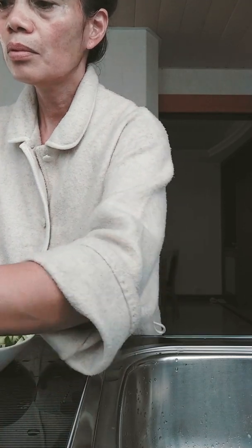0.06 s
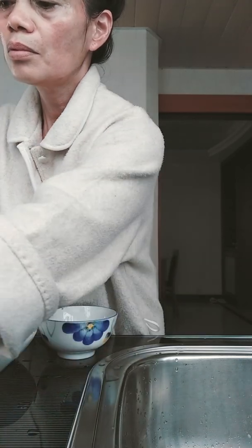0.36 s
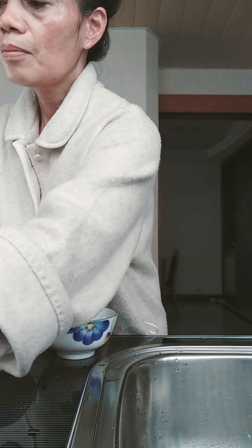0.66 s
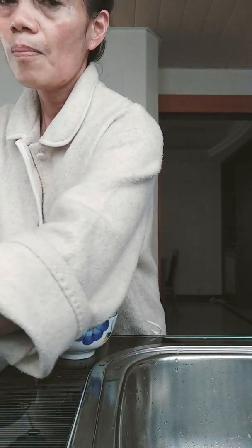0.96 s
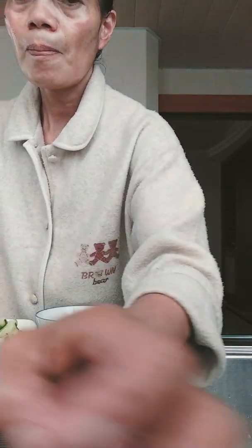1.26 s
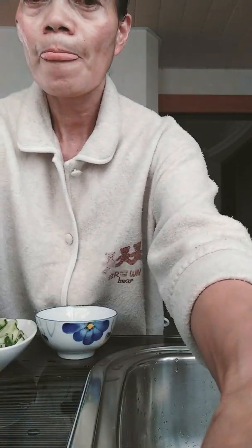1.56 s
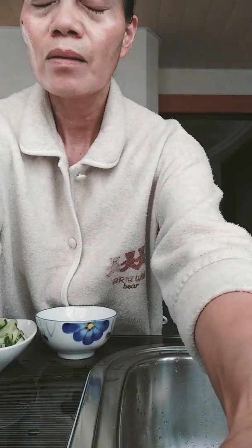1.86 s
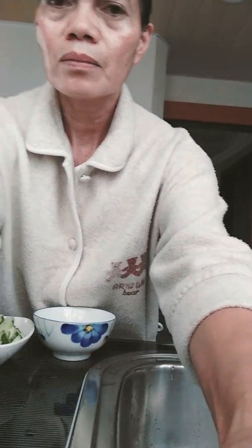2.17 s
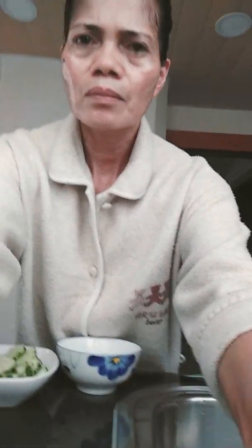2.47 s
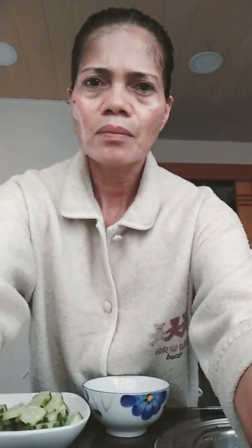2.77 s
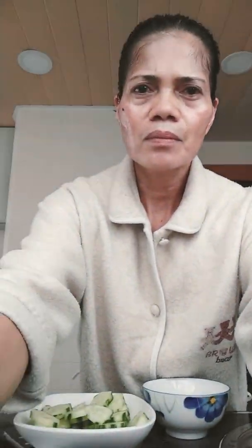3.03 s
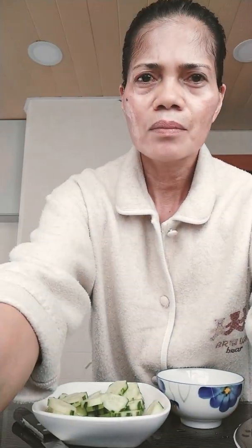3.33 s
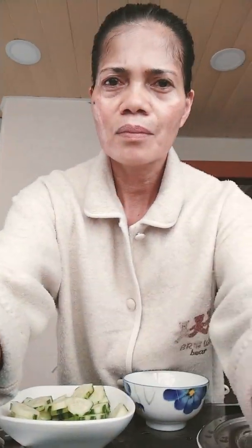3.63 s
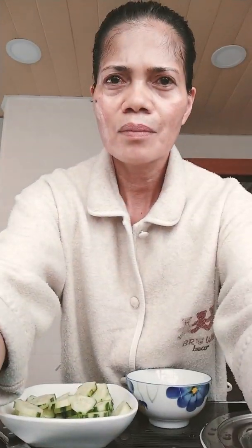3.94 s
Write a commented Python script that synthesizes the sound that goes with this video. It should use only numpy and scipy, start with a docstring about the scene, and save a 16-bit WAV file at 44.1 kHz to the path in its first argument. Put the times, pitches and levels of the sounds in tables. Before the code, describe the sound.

A ceramic bowl knocks and clinks on a kitchen counter from the start, with the loudest hollow clacks around 0.7 to 1.1 seconds and a short room echo. It then rocks ever faster, fading to rest by 1.7 seconds. Tiny ticks follow as a phone is handled, with close finger taps and soft thumps near 2.4, 2.6 and 3.7 seconds. A faint hum lies underneath; everything leans left.

```python
"""Hollow knocks and clacks: a hard dish is shifted on a kitchen counter, knocked down again, and rocks
ever faster until it rests. Each knock rings the dish and the counter, and the room answers.
Then, right at the microphones, a hand picks up the phone: finger taps, soft thumps and tiny ticks
on its case. A quiet room hum lies under it all; the stereo picture leans to the left."""
import sys
import numpy as np
from scipy import signal
from scipy.fft import rfft, irfft
from scipy.io import wavfile

SR = 44100
rng = np.random.default_rng(int(sys.argv[2]) if len(sys.argv) > 2 else 0)


def store_pcm(level_fs):
    """Save levels as 16-bit WAV."""
    pcm = np.round(np.clip(level_fs, -1, 1) * 32767).astype(np.int16)
    wavfile.write(sys.argv[1], SR, np.atleast_2d(pcm).T)


N = 176400
TIME = np.arange(N) / SR
BODY_RISE_S = 0.001  # attack of dish and counter
EDGE_RIGHT_DB = -5.5  # the crockery's highs at the right microphone


def dish(clink_s=0.2565):
    """The shifted dish knocks on the counter, with one glassy clink of glaze on glaze."""
    # the dish meets the counter: start_s, ring_db, clack_db, edge_db
    knocks = [(0.001, -16, -19.5, -37.5), (0.029, -18.5, -30.5, -55.5), (0.06, -12, -14, -30),
              (0.111, -11, -16.5, -31), (0.153, -14.5, -28, -41.5), (0.258, -18, -17.5, -29),
              (0.277, -17, -37, -34.5), (0.2996, -14, -21, -41), (0.513, -26, -20, -43.5),
              (0.555, -31.5, -24, -51.5), (0.583, -30, -23.5, -48), (0.739, -9, -7, -25.5),
              (0.7855, -9, -3.5, -17.5), (0.798, -11.5, -28.5, -41), (0.9384, -7, -8, -26.5),
              (0.999, -15, -13, -25), (1.029, -14.5, -8, -29.5), (1.044, -8.5, -29, -28.5),
              (1.101, -14, -19, -33.5), (1.151, -14, -17, -38.5)]
    # colour of the clink: frequency_hz, gain_db
    clink_colour = [(2000, -11), (6900, 8), (7600, -17), (8800, 20.5), (9700, 17.5), (11000, -1)]
    # where the dish stands, as the right microphone hears it: time_s, gain_db
    dish_place = [(0.3, 1.5), (0.76, 3), (0.94, -1.5)]
    starts, ring_db, clack_db, edge_db = np.transpose(knocks)
    clink = contacts([clink_s], levels_db=[-3], fade_s=0.0043)
    clink = colour(clink, clink_colour) * sides(EDGE_RIGHT_DB)
    knocking = dish_ring(starts, ring_db) + blows(starts, ring_db, clack_db, edge_db)
    left, right = knocking + glaze(starts, edge_db) + clink
    return np.array([left, right * from_db(np.interp(TIME, *np.transpose(dish_place)))])


def rocking(rebound_s=0.0068, rebound_db=-4):
    """The dish settles from foot to foot, ever faster; each foot lands twice."""
    # a foot comes down: start_s, level_db
    rocks = [(1.166, -15.5), (1.223, -15), (1.273, -17), (1.325, -16), (1.375, -21.5), (1.410, -19.5),
             (1.448, -18.5), (1.486, -21), (1.516, -20.5), (1.535, -20.5), (1.552, -24), (1.585, -25.5),
             (1.612, -31.5), (1.639, -31.5)]
    starts, levels_db = np.transpose(rocks)
    landings = np.r_[starts, starts + rebound_s]
    landing_db = np.r_[levels_db, levels_db + rebound_db]
    ring = dish_ring(starts, levels_db)
    return ring + blows(landings, body_db=landing_db - 8, clack_db=landing_db - 7, edge_db=landing_db - 27)


def dish_ring(starts, levels_db, hollow_hz=820, hollow_db=1.5, swell_s=0.0037, scatter_db=2.5):
    """Every blow sounds a hollow note that swells and dies at once, and strikes each mode differently."""
    # modes of dish and counter: pitch_hz, level_db, t60_s
    modes = [(243.6, -18, 0.12), (370, -17.5, 0.13), (514.7, -12, 0.06), (606.8, -17.5, 0.21),
             (678.3, -13, 0.12), (939, -10.5, 0.1), (1164, -7, 0.049), (1395, -9, 0.03), (1630, -4, 0.019),
             (2296, -14.5, 0.021)]
    out, t = np.zeros((2, N)), TIME[:12000]
    hz, mode_db, t60 = np.transpose(modes)
    attack = 1 - np.exp(-t / BODY_RISE_S)
    ringing = np.sin(2 * np.pi * hz[:, None] * t) * from_db(-60 * t / t60[:, None]) * attack
    swell = t / swell_s * np.exp(1 - t / swell_s)
    for start_s, db in zip(starts, levels_db):
        strengths = from_db(mode_db + scatter_db * rng.standard_normal(len(hz)))
        strengths *= rng.choice([-1, 1], len(hz))
        note_hz = hollow_hz * (1 + 0.022 * rng.standard_normal())
        note = from_db(hollow_db) * swell * np.sin(2 * np.pi * note_hz * t)
        add(out, start_s, from_db(db) * (strengths @ ringing + note))
    return out * sides(right_db=-22)


def blows(starts, body_db, clack_db, edge_db, glance_s_per_db=0.02, right_lag_s=0.00016):
    """The dense body of the counter, the clack of the foot and its bright edge; glancing blows swell."""
    # colour of the counter's body: frequency_hz, gain_db
    body_colour = [(40, -34.5), (85, 12.5), (145, 22), (200, 13.5), (400, 30.5), (750, 32.5), (1170, 33),
                   (1700, 21.5), (3000, 4), (6000, -36)]
    # colour of the foot's clack: frequency_hz, gain_db
    clack_colour = [(500, 3.5), (1400, 31), (1900, 27), (2300, 32.5), (2950, 17.5), (3300, 21), (3650, 11),
                    (8000, -18)]
    # colour of the bright edge: frequency_hz, gain_db
    edge_colour = [(1500, -31), (4000, 25.5), (7200, 22.5), (8800, 30), (9900, 24.5), (11300, 10),
                   (14000, -3.5)]
    # the weaker the clack against the body, the more slowly the foot rolls on
    roll_s = np.maximum(glance_s_per_db * (body_db - clack_db), 0)
    body = contacts(starts, body_db, fade_s=0.008, rises_s=BODY_RISE_S + roll_s, alike=0.9)
    left, right = colour(body, body_colour)
    body = np.array([left, np.interp(TIME - right_lag_s, TIME, right)])
    clack = colour(contacts(starts, clack_db, fade_s=0.0062, rises_s=roll_s, alike=0.37), clack_colour)
    edge = colour(contacts(starts, edge_db, fade_s=0.018), edge_colour)
    return body * sides(right_db=-1) + clack * sides(right_db=-8) + edge * sides(EDGE_RIGHT_DB)


def glaze(starts, levels_db, t60_s=0.3):
    """The bright edge of each knock leaves thin, high tones ringing in the crockery."""
    # high modes of the crockery: pitch_hz, level_db
    modes = [(3320, -19.5), (5819, -22.5), (8540, -24), (10160, -23.5), (11040, -29), (12420, -22.5),
             (12980, -28)]
    out, t = np.zeros((2, N)), TIME[:SR // 2]
    hz, mode_db = np.transpose(modes)
    ringing = np.sin(2 * np.pi * hz[:, None] * t) * from_db(-60 * t / t60_s)
    for start_s, db in zip(starts, levels_db):
        strengths = from_db(db + mode_db) * rng.standard_normal((2, len(hz)))
        add(out, start_s, strengths @ ringing)
    return out * sides(EDGE_RIGHT_DB)


def taps(travel_at_1khz_s=0.00097):
    """Fingers tap the phone; a softer contact is duller, and the case carries the highs first."""
    # a finger lands: start_s, level_db, cutoff_hz
    touches = [(2.3754, -3.5, 3860), (2.5563, 2, 3700), (3.0751, -16, 2000), (3.619, -9, 1090),
               (3.627, -8.5, 650), (3.644, -11.5, 740), (3.6967, -2, 1340), (3.701, 9.5, 407)]
    # colour of the tapped case: frequency_hz, gain_db
    case_colour = [(60, -29), (200, 8), (420, 14), (1150, 16), (1700, 10.5), (2900, 8), (4500, -5.5),
                   (9500, 12), (15000, 7)]
    out = np.zeros((2, N))
    for start_s, db, cutoff_hz in touches:
        softness = signal.butter(2, cutoff_hz, fs=SR, output="sos")
        add(out, start_s, from_db(db) * signal.sosfilt(softness, burst(fade_s=0.0021)))
    hz = np.fft.rfftfreq(N, 1 / SR)
    bending = np.exp(-4j * np.pi * travel_at_1khz_s * np.sqrt(1000 * hz))
    return colour(irfft(rfft(out) * bending, N), case_colour) * sides(right_db=-8)


def thumps(sag=0.99, sag_s=0.0054, rise_s=0.00067, pitch_spread=0.065):
    """Low bumps reach the phone through counter or palm and push its microphones in opposite directions."""
    # a bump arrives: start_s, level_db
    bumps = [(0.456, -33), (2.33, -23), (2.357, -25.5), (2.378, -28), (2.571, -14.5), (2.619, -24),
             (3.158, -29.5), (3.702, -40.5)]
    # what a bump rings with: pitch_hz, level_db, t60_s
    modes = [(88, -9, 0.15), (134, -0.5, 0.15), (201.6, -1, 0.22), (338, -9.5, 0.23)]
    out, t = np.zeros((2, N)), TIME[:SR // 2]
    attack = 1 - np.exp(-t / rise_s)
    # the pitch starts sharp by the share `sag` and sinks as the grip yields
    sinking = t + sag * sag_s * (1 - np.exp(-t / sag_s))
    for start_s, db in bumps:
        grip = 1 + pitch_spread * rng.standard_normal()
        ring = sum(from_db(db + mode_db - 60 * t / t60) * np.sin(2 * np.pi * hz * grip * sinking)
                   for hz, mode_db, t60 in modes)
        add(out, start_s, attack * ring)
    return out * sides(right_db=-5) * [[1], [-1]]


def ticks():
    """The case ticks under the grip, right at the left microphone port."""
    # tiny clicks of the case: start_s, level_db
    clicks = [(1.7425, -31.5), (1.7712, -34.5), (1.9514, -33), (1.9867, -39), (2.09, -31), (2.3277, -38.5),
              (2.4435, -40.5), (3.1578, -25.5), (3.2227, -41.5), (3.4142, -33), (3.4233, -26.5),
              (3.4476, -14.5), (3.569, -35.5), (3.741, -35.5), (3.8348, -35.5), (3.9692, -43)]
    # colour of a click: frequency_hz, gain_db
    click_colour = [(1000, 1.5), (7800, 14.6), (9600, 30.7), (11000, 18.2), (15500, 9)]
    return colour(contacts(*np.transpose(clicks), fade_s=0.00066), click_colour) * sides(right_db=-50)


def brush(grain_db=4, grain_samples=32):
    """Skin and sleeve scratch faintly on the case: mostly fine grains, now and then a coarse one."""
    # strength of the rubbing: time_s, level_db
    rubbing = [(1.5, -57), (1.77, -52.5), (1.87, -65.5), (3, -66), (3.42, -61.5), (3.63, -58.5),
               (3.78, -65)]
    # colour of the friction: frequency_hz, gain_db
    friction_colour = [(1500, -20.5), (4000, -2), (7500, -2.5), (9400, 9), (11000, -10.5)]
    coarseness = np.minimum(rng.exponential(1, N // grain_samples + 1), 5) - 1
    grain = from_db(grain_db * np.repeat(coarseness, grain_samples)[:N])
    level = from_db(np.interp(TIME, *np.transpose(rubbing)))
    return colour(rng.standard_normal((2, N)) * grain * level, friction_colour) * sides(right_db=-4)


def kitchen(sound, build_s=0.0093):
    """The room answers with a diffuse tail that builds up quickly and dies band by band."""
    # decay of the kitchen: frequency_hz, t60_s
    decay = [(150, 0.5), (700, 0.54), (2500, 0.7), (10000, 0.45)]
    # colour of the tail: frequency_hz, gain_db
    tail_colour = [(100, 5), (820, -4), (1400, 1.5), (3000, -2), (10000, -6.5)]
    t, hz = TIME[:SR], np.arange(SR // 2 + 1)
    white, tail = rfft(rng.standard_normal((2, SR))), 0
    edges_hz = np.r_[0, np.geomspace(200, 12800, 7), SR]
    for low, high in zip(edges_hz, edges_hz[1:]):
        band = irfft(white * ((hz >= low) & (hz < high)))
        envelope = from_db(-60 * t / at_hz(decay, (low + high) / 2)) * (1 - np.exp(-t / build_s))
        tail = tail + band * envelope / np.sqrt(np.sum(envelope ** 2))
    reverb = signal.fftconvolve(sound[:1], tail, axes=1)[:, :N]
    return colour(reverb, tail_colour) * sides(right_db=-6)


def air(noise_db=-52, mains_hz=49.5, mains_db=-59):
    """Room tone: steady noise, a faint appliance hum, and a mains drone out of phase left to right."""
    # colour of the room noise: frequency_hz, gain_db
    noise_colour = [(25, -4.5), (55, 1), (120, -8.5), (205, -1), (450, -3.5), (750, -13.5), (1700, -24),
                    (4500, -34.5), (7000, -34), (9500, -32.5), (12500, -43.5)]
    # stereo width, side against mid: frequency_hz, gain_db
    width = [(50, -15.5), (240, -16), (950, 1)]
    # steady appliance tones: pitch_hz, level_db
    tones = [(202, -56), (1378, -71), (2266, -75)]
    mid, side = colour(rng.standard_normal((2, N)), noise_colour)
    noise = (mid + colour(side, width) * [[1], [-1]]) / np.std(mid)
    hum = sum(from_db(db) * np.sin(2 * np.pi * (hz * TIME + rng.random())) for hz, db in tones)
    drone = from_db(mains_db) * np.sin(2 * np.pi * mains_hz * TIME) * [[1], [-0.5]]
    return (from_db(noise_db) * noise + hum + drone) * sides(right_db=-2.5)


def contacts(starts, levels_db, fade_s, rises_s=0, alike=0):
    """One burst for each contact."""
    out = np.zeros((2, N))
    for start_s, db, rise_s in zip(starts, levels_db, np.broadcast_to(rises_s, len(starts))):
        add(out, start_s, from_db(db) * burst(fade_s, rise_s, alike))
    return out


def burst(fade_s, rise_s=0, alike=0.28, size=8192):
    """A dying spray of tiny contacts with unit energy; `alike` sets how much the microphones share."""
    t = TIME[1:size + 1]
    fade = np.exp(-t / fade_s) * (1 - np.exp(-t / (rise_s + 1e-9)))
    spray = rng.standard_normal((2, size)) * fade
    spray[1] = alike * spray[0] + np.sqrt(1 - alike ** 2) * spray[1]
    for _ in range(2):  # even out the spectrum, then shape the fade again
        spectrum = rfft(spray)
        spray = irfft(spectrum / (abs(spectrum) + 1e-12)) * np.sqrt(fade)
    return spray / np.sqrt(np.sum(spray ** 2, axis=1, keepdims=True))


def colour(sound, spectrum, size=4096):
    """Causal (minimum-phase) filter through points of frequency_hz, gain_db."""
    gains = from_db(at_hz(spectrum, np.linspace(0, SR / 2, size // 2 + 1)))
    cepstrum = irfft(np.log(gains))
    cepstrum[1:size // 2] *= 2
    cepstrum[size // 2 + 1:] = 0
    impulse = irfft(np.exp(rfft(cepstrum)))
    return signal.oaconvolve(np.atleast_2d(sound), impulse[None], axes=1)[:, :N]


def at_hz(points, hz):
    """Read a table on a log-frequency axis."""
    points_hz, values = np.transpose(points)
    return np.interp(np.log(np.maximum(hz, 1)), np.log(points_hz), values)


def from_db(db):
    """Decibels to gain."""
    return 10 ** (np.asarray(db) / 20)


def sides(right_db):
    """Gains of the left and right microphone."""
    return np.array([[1], [from_db(right_db)]])


def add(out, start_s, sound):
    """Mix a sound in at a time."""
    start = int(start_s * SR)
    out[:, start:start + sound.shape[-1]] += sound[..., :N - start]


def scene(rocking_send_db=-4.5, tap_send_db=-21):
    """The dish fills the room; its rocking is drier, and the handling is close and nearly dry."""
    clatter, settling, tapping = dish(), rocking(), taps()
    room = kitchen(clatter + from_db(rocking_send_db) * settling + from_db(tap_send_db) * tapping)
    return clatter + settling + tapping + ticks() + room + thumps() + brush() + air()


def record(dry, cutoff_hz=16500):
    """The phone clips peaks at full scale and cuts the top treble."""
    lowpass = signal.ellip(10, 0.1, 80, cutoff_hz, fs=SR, output="sos")
    return signal.sosfilt(lowpass, np.clip(dry, -1, 1))


dry = scene()
out = record(dry)
store_pcm(out)
```